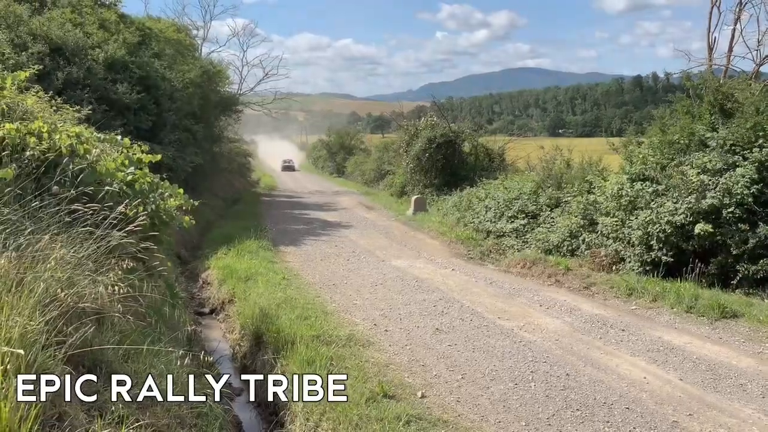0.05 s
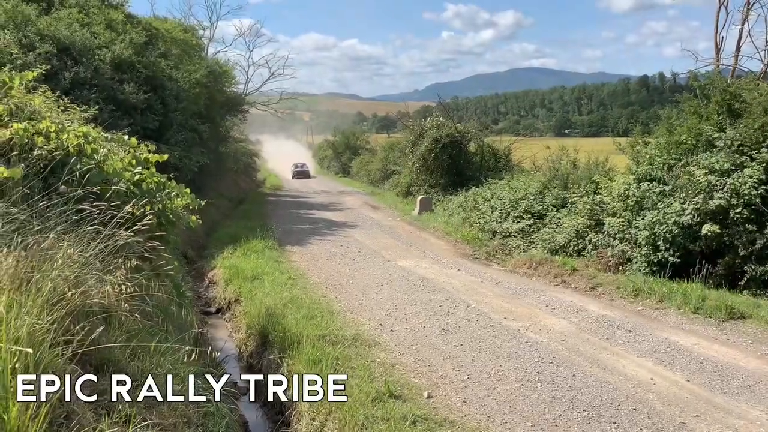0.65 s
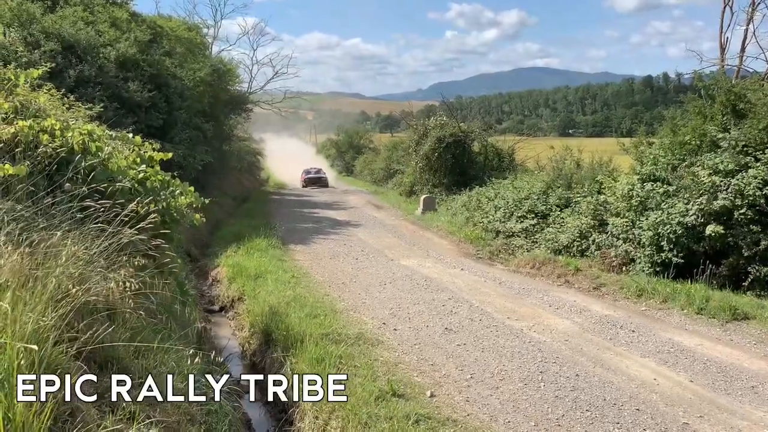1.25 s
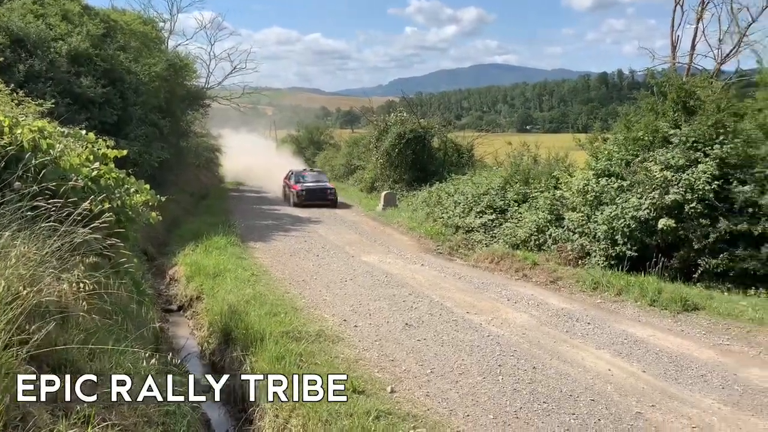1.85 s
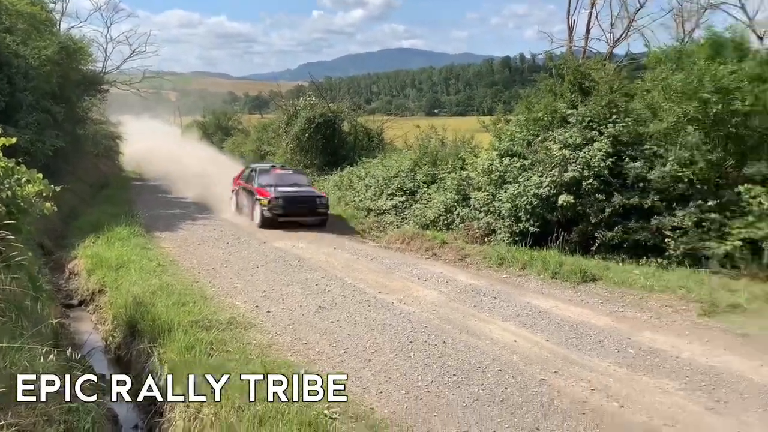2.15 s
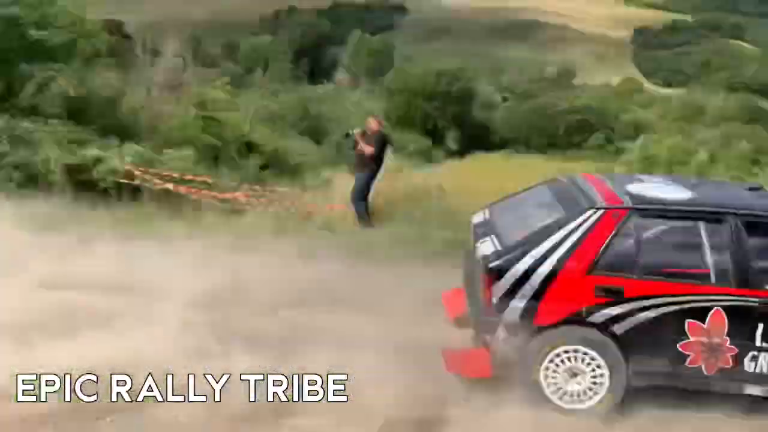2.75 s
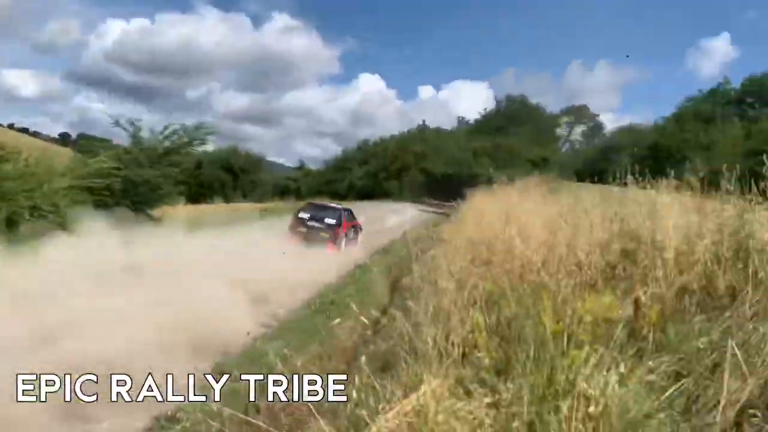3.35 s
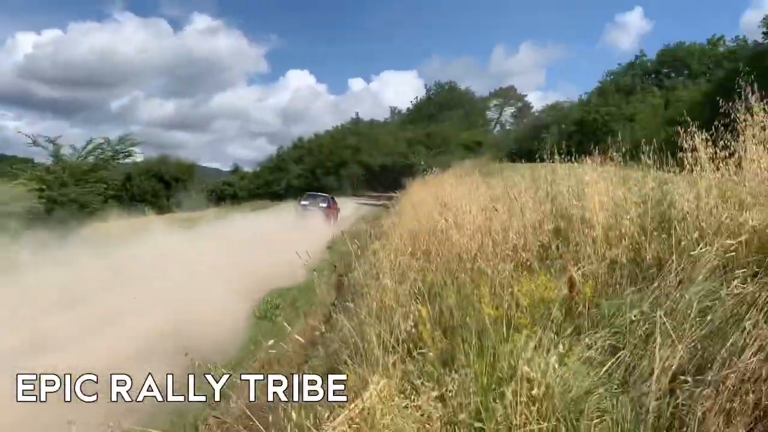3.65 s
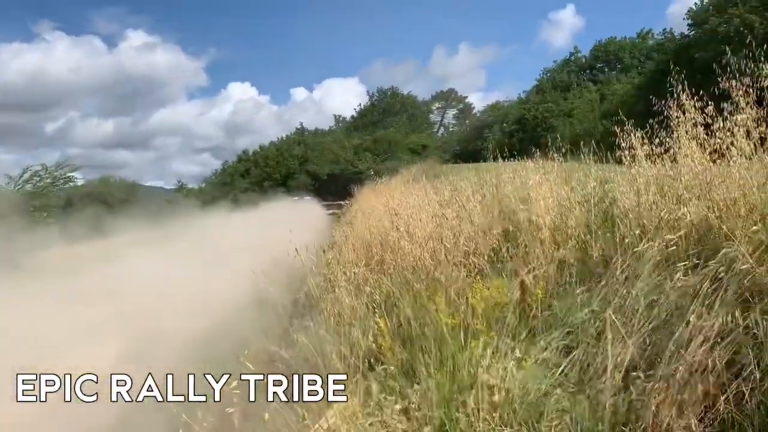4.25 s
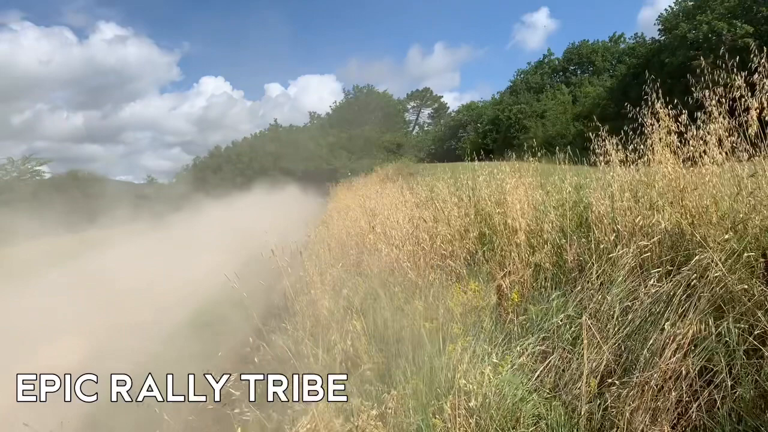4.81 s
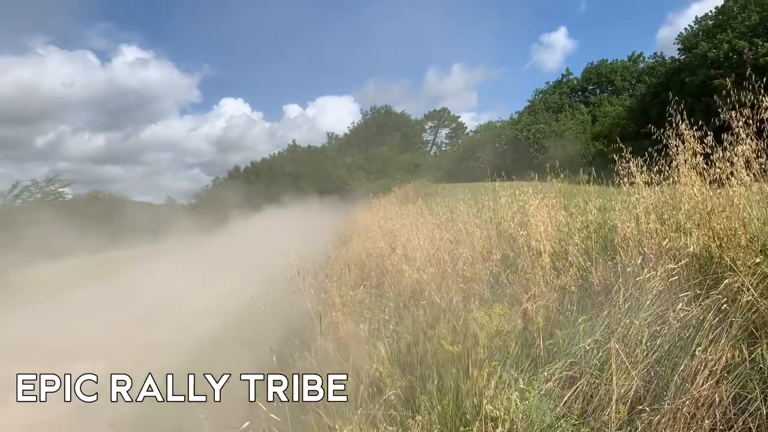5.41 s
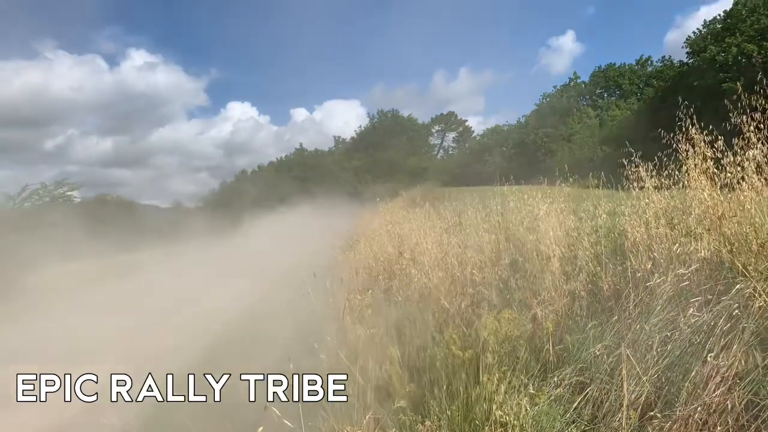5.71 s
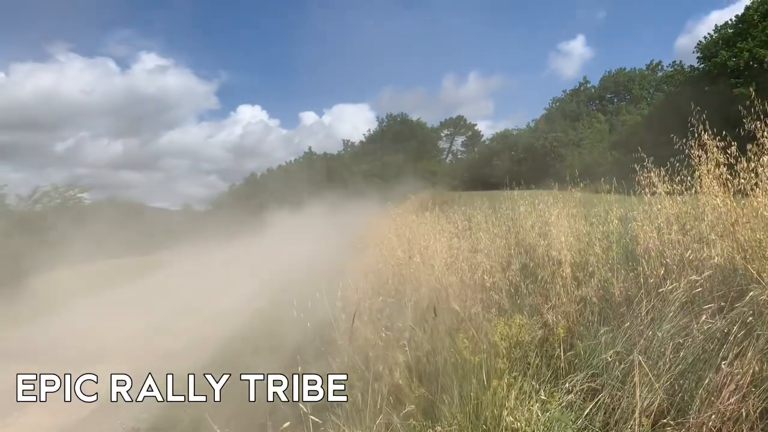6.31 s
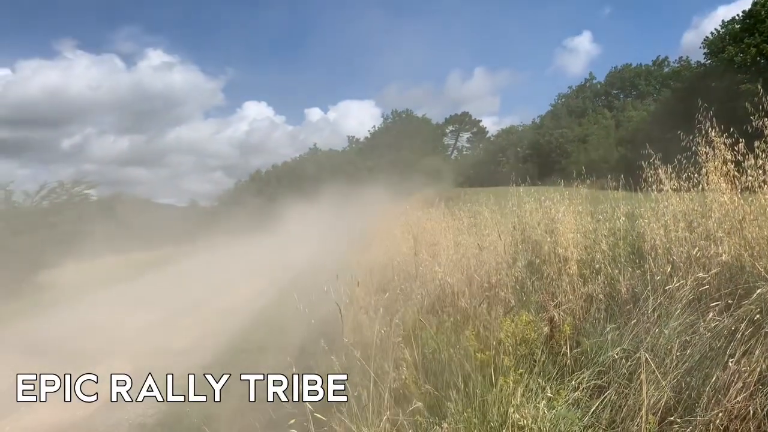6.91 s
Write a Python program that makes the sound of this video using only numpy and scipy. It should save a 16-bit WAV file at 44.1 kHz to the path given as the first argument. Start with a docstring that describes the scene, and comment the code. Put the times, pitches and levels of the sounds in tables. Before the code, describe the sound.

A rally car charges up on gravel, roars past close by spraying stones, backfires sharply and rasps away into the distance.

```python
"""Tyres roar on gravel and an engine snarls: a four-cylinder rally car charges up to a roadside microphone.
It passes about 7 m away at full throttle, spraying stones, and the driver lifts off. Unburnt fuel pops in
the pipe, with two loud backfires; then the car rasps away over a rise as the driver works the throttle.
Each firing sends a pulse of gas that rings the exhaust and tears out of the tailpipe.
The hedges give a short echo, and the air rumbles at the microphone."""
import sys
import numpy as np
from scipy import signal
from scipy.fft import rfft, irfft, next_fast_len
from scipy.io import wavfile
from scipy.ndimage import uniform_filter1d, map_coordinates

SR = 44100
rng = np.random.default_rng(int(sys.argv[2]) if len(sys.argv) > 2 else 0)


def waveform_to_disk(signal):
    """Save audio, clipped to [-1, 1], as 16-bit WAV at the path in sys.argv[1]."""
    frames = np.transpose(np.atleast_2d(signal))
    scaled = np.clip(frames, -1, 1) * 32767
    samples = np.round(scaled).astype(np.int16)
    wavfile.write(sys.argv[1], SR, samples)


N = 307377
TIME = np.arange(N) / SR

# Engine speed: (time [s], firing rate [Hz])
REVS = [(0.0, 185.9), (0.16, 166.5), (0.4, 194.7), (0.56, 192.7), (0.68, 172.2), (0.8, 175.1),
        (0.92, 153.7), (1.0, 160.1), (1.1, 180.4), (1.55, 168.4), (1.82, 174.8), (1.98, 172), (2.14, 180.9),
        (2.4, 177.4), (2.54, 200.6), (2.78, 163.8), (3.0, 158.8), (3.1, 150.9), (3.56, 150), (3.66, 168),
        (3.9, 164.6), (4.08, 146.6), (4.35, 115.1), (4.52, 126.5), (4.62, 154.6), (4.8, 137.8),
        (4.9, 133.8), (4.94, 178.8), (5.04, 169.3), (5.12, 178), (5.34, 173.7), (5.66, 143.9), (5.75, 168),
        (5.84, 147), (5.91, 169.6), (6.0, 162.1), (6.22, 184), (6.48, 177.4), (6.71, 152.1), (6.8, 170.5),
        (6.97, 183.2)]
# The driver's foot: (time [s], pedal [0-1])
THROTTLE = [(0, 0.25), (1.25, 0.19), (1.48, 0.52), (1.65, 0.8), (1.82, 0.87), (1.92, 0.3), (2.13, 0.75),
            (2.32, 0.56), (2.68, 1), (3.02, 0.84), (3.08, 0), (4.46, 0.08), (4.6, 0.2), (5.55, 0.6),
            (5.8, 0.61), (6.97, 0.84)]
# Cylinders in firing order, at full unevenness: (strength [dB], header delay [ms])
CYLINDERS = [(-5, -0.21), (3.5, -0.22), (2.5, -0.061), (-9, 0.82)]
# How unequal the cylinders sound: (time [s], depth [0-1])
UNEVEN = [(2.85, 0.74), (4.3, 0.38), (4.65, 0.47), (5.1, 1), (5.6, 0.76), (6.2, 0.57), (6.7, 0.65)]
# The exhaust booms most at low revs: (firing rate [Hz], gain [dB])
BOOM_GAIN = [(112, -3), (135, -0.5), (153, -1.5), (165, -4.5), (180, -5), (200, -8.5)]
# The boom swells as the car digs in: (time [s], boost [dB])
SURGES = [(.72, 1), (.97, 3)]
# The resonance in which the howl peaks: (frequency [Hz], gain [dB])
HOWL_GAIN = [(310, -1.5), (340, -5), (360, -2.5), (400, -11.5)]
# The tailpipe swings towards the microphone: (time [s], pipe level [dB], rasp level [dB])
NEAR_LEVELS = [(2.3, -27.5, -26), (2.5, -23.5, -26.5), (2.65, -27.5, -34.5), (2.74, -32.5, -14),
               (2.85, -22.5, -8.5), (2.92, -23.5, -14), (2.98, -24.5, -24), (3.04, -34.5, -16.5),
               (3.07, -34, -76)]
# Close up, the pipe, its rasp and its churning gas: (frequency [Hz], gain [dB])
NEAR_PIPE = [(50, -42), (120, 2), (200, -2.5), (280, 6), (390, 9), (480, 6.5), (580, -11), (760, -17.5),
             (970, -6.5), (1300, -15.5), (2000, -15.5), (4000, -45.5)]
NEAR_RASP = [(400, -39), (1000, -5), (1350, 2), (1700, 2), (2150, 1), (2750, -9), (4000, -6), (5500, -6),
             (7000, -18), (9000, -21), (15000, -46)]
CHURN = [(150, -10), (320, 5), (520, -3.5), (1200, -19)]
# From a distance, the hollow pipe, the slack pipe and the rasp: (frequency [Hz], gain [dB])
HOLLOW_PIPE = [(40, -67), (90, 10), (135, 3.5), (220, -27.5), (310, -39.5), (410, 1), (490, -4), (575, 3.5),
               (680, -6.5), (850, -44.5), (1150, -10), (1600, -24), (2400, -52)]
SLACK_PIPE = [(40, -30), (90, -9), (135, -12), (220, -40), (310, -7.5), (420, 18.5), (520, 10), (630, -5.5),
              (800, 13), (950, -32), (1600, -46), (2400, -56.5)]
FAR_RASP = [(400, -66), (900, -2), (1150, -0.5), (1550, 4.5), (2000, 3), (2650, -21.5), (3500, -10),
            (5000, -25), (8000, -38.5), (15000, -61.5)]
# Colour of the receding pipe: (time [s], blend [0 slack - 1 hollow])
HOLLOWNESS = [(3.05, 0.6), (4.3, 0.58), (4.6, 0.78), (5.6, 0.99), (6.3, 0.5), (6.8, 0.16)]
# The rasp from behind: (time [s], level against the pipe [dB])
RASP_LEVEL = [(3.05, -14), (3.3, -16.5), (4.2, -11), (4.47, -24), (4.8, -10.5), (5.2, -11.5), (5.55, -9),
              (5.72, -8), (5.98, -7.5), (6.1, -9.5), (6.5, -10.5), (6.75, -4)]
# Unburnt fuel flares up in the pipe: (time [s], boost [dB])
FLARES = [(3.17, 10), (3.49, 7), (3.74, 9.5), (3.85, 8)]
# Backfires, from muffled pops to sharp bangs: (time [s], thump level [dB], crack level [dB])
BANGS = [(0.579, -18, -50), (3.039, -17.5, -25.5), (3.14, -25, -43.5), (3.486, -28.5, -36.5),
         (3.504, -21, -29.5), (3.5386, -26, -25.5), (3.544, -24.5, -32), (3.662, -22, -37),
         (3.694, -25, -31), (3.7664, -12.5, -8.5), (3.9109, -11.5, -4.5), (4.063, -31, -53)]
# The gas column in the pipe: (frequency [Hz], level [dB], t60 [s])
PIPE_MODES = [(285, -13, .07), (470, -14, .06), (594, -15, .05), (807, -12, .035), (1443, -18, .02),
              (1631, -18, .02)]
# Single hard firings, far up the road: (time [s], level [dB])
HARD_FIRINGS = [(6.632, -41), (6.657, -49), (6.6825, -30.5), (6.7085, -29.5), (6.7345, -34)]
# Colour of a backfire's crack and of a hard firing: (frequency [Hz], gain [dB])
BLAST = [(200, -1), (700, 19), (1500, 7), (2400, -13.5), (3800, 4.5), (6000, 0), (9000, 1), (15000, -16)]
HARD_BODY = [(400, -5), (900, -2), (1600, 9), (2100, 7), (2650, -5), (3600, 11), (5200, -5),
             (7000, -4), (15000, -46)]
# The pitched snarl coming up and the pitched pull going away: (time [s], level [dB])
SNARL = [(0, -46.5), (0.499, -46.5), (0.899, -31), (1.2, -34.5), (1.601, -43), (1.85, -26.5), (2.2, -39)]
PULL = [(4.5, -48), (4.63, -39), (4.9, -48.5), (5.15, -49), (5.5, -47.5), (5.8, -49.5), (6.1, -56),
        (6.35, -52.5), (6.701, -51), (6.97, -52)]
# Their colours: (frequency [Hz], gain [dB])
SNARL_BODY = [(200, -27), (310, -4), (400, 9), (490, 1), (560, -3.5), (680, -1.5), (820, -13), (1000, -12),
              (1500, -26), (3000, -42)]
PULL_BODY = [(250, -41.5), (370, 3), (440, 1.5), (500, -11), (585, 10), (660, -8.5), (770, -9), (920, -34),
             (1150, -12.5), (1650, -24), (2400, -49.5)]
# Resonances of the silencer and of the escaping gas: (time [s], frequency [Hz], level [dB])
GROWL = [(4.45, 570, -62), (4.63, 595, -43), (4.85, 560, -49), (5.15, 560, -44), (5.36, 565, -44),
         (5.55, 595, -45), (5.9, 610, -51), (6.35, 590, -53), (6.65, 640, -62)]
SIZZLE = [(2.55, 3100, -68.5), (2.65, 3250, -41), (2.72, 3500, -25.5), (2.755, 4000, -22.5),
          (2.86, 4300, -37.5), (3.03, 3700, -41), (3.1, 3600, -80), (4.4, 3200, -83), (4.6, 3200, -63),
          (4.95, 3400, -85), (5.5, 3700, -70), (5.8, 3600, -75), (6, 3400, -66), (6.2, 3200, -67.5),
          (6.45, 3400, -91)]
# Their colours: (frequency [Hz], gain [dB])
GROWL_BODY = [(150, -32), (450, 19), (750, 7), (2500, -19)]
SIZZLE_BODY = [(1500, -17.5), (3000, -1), (4500, 1.5), (8000, -10)]
# Engine overtones that sing out close by: (multiple of the firing rate [x], level [dB])
WHINES = [(3.75, 2), (5.25, 4), (7.25, -2.5), (10.25, -2.5)]
# Tyres scrub the gravel, stones crunch under them, larger ones are flung: (time [s], level [dB])
SCRUB = [(0, 2.5), (.25, 2.5), (.95, -2), (1.15, -4), (1.38, -1.5), (1.55, -4.5), (1.97, 2), (2.3, -0.5),
         (2.6, 4), (2.76, 6)]
CRUNCH = [(2.0, -43.5), (2.35, -40.5), (2.55, -35.5), (2.74, -27.5), (2.88, -30.5), (3.05, -46.5),
          (3.2, -51.5)]
STONES = [(0.4968, -28), (2.748, -10), (2.7538, -10), (2.7968, -15), (2.9956, -19.5), (3.8631, -37),
          (4.4941, -48), (4.6342, -52)]
# Tyre roar, the spray's hiss and fizz, a stone's click, rumbling air: (frequency [Hz], gain [dB])
ROAR = [(50, -41.5), (100, -18.5), (150, -1), (260, -4.5), (400, 2.5), (540, -6), (660, -3.5), (820, -11.5),
        (980, -8.5), (1600, -25), (2500, -62), (5000, -83.5)]
HISS = [(700, -3), (1400, 3), (2500, -3), (4000, -1.5), (5200, -5.5), (7000, -4.5), (9000, -4),
        (12000, -14.5), (15500, -40)]
FIZZ = [(7000, -41.5), (11500, 1), (13500, -9), (15500, -15)]
CLICK = [(300, -31), (2000, -12.5), (4000, 7), (6000, 9.5), (9000, 7.5), (15000, -8.5)]
RUMBLE = [(20, -45.5), (35, -19.5), (50, 4), (75, 6.5), (110, 4.5), (200, -1.5), (500, -42)]
# Breeze at the microphone: (time [s], level [dB])
WIND = [(3, -47.5), (5, -55.5), (6.25, -57), (6.5, -48)]
# Echo off the hedges: (frequency [Hz], t60 [s])
HEDGE_DECAY = [(150, .6), (1500, .1), (4000, .04), (10000, .04)]
# Leaves scatter little bass: (frequency [Hz], gain [dB])
LEAVES = [(200, -16.5), (1200, 8), (4000, 3)]
# The car's direction from the microphone: (time [s], right minus left [dB])
BEARING = [(0, 2), (2.2, 1.55), (2.6, 3), (3.6, 2), (4.4, 2), (6.97, 1.3)]
# Most of the scene reaches the two channels out of step, by a fixed phase that depends on frequency: (frequency
# [Hz], left lead [rad])
PORT_PHASE = [(100, .03), (700, .35), (1500, 1.1), (2100, 2.6), (2450, .9), (3200, 1.5), (4800, 2.3),
              (6000, 2.4), (7200, 3.14), (8200, 2.1), (9000, .3), (9700, -.3), (10600, -1.8), (11400, -3.1),
              (12200, -3.2), (13000, -5), (13600, -6.2)]
# Stereo width: (frequency [Hz], diffuse minus direct [dB])
WIDTH = [(60, -17), (150, -33.5), (380, -10.5), (950, -9.5), (2400, 0), (4500, -4.5), (9000, -11.5),
         (15000, -11)]

SPEED_M_PER_S, DISTANCE_M, PASS_S = 28.4, 6.75, 2.39  # the car's speed, nearest distance, time there
LIFT_S = 3.05  # the driver lifts off
DUCK_DB, DUCK_RECOVER_S = 17.5, 0.45  # just after the loud pass the boom is ducked, then swells back
RISE_S, RISE_TAKES_S = 4.1, 0.87  # the car sinks behind the rise
ROUGH_SHUT, ROUGH_OPEN = 0.43, 0.035  # irregular burning (0-1), off and on the throttle
THUMP_START_HZ, THUMP_END_HZ, THUMP_SINK_S, THUMP_T60_S = 874, 83, 0.00286, 0.089
THUMP_LAG_S = 0.00082  # the gas leaves the pipe just after the crack
SPRAY_END_S, SPRAY_FADE_S, SPRAY_DROP_DB = 2.785, 0.39, 23  # the shower dies once the car is past
CRUNCH_PER_S, CRUNCH_MIDDLE_HZ, CRUNCH_CYCLES = 600, 2690, 7
GROUND_MS = 1  # delay of the bounce off the road when the car is nearest
TOP_HZ = 15900


def crank(flutter):
    """Count of firings so far; the speed flutters as the tyres slip."""
    return np.cumsum(curves(REVS)[0] * (1 + flutter * wobble(45))) / SR


def throttle():
    """The pedal, 0 shut to 1 open."""
    return np.clip(curves(THROTTLE)[0], 0, 1)


def roughness():
    """The engine burns evenly under load and misfires ever more as the throttle shuts."""
    return ROUGH_OPEN + (ROUGH_SHUT - ROUGH_OPEN) * (1 - throttle()) ** 2.4


def firings(count, scatter, jitter):
    """One exhaust pulse per firing, sized and delayed by cylinder; misfires scatter size and timing."""
    k = np.arange(1, int(count[-1]))
    due = np.interp(k, count, TIME)
    rough = np.interp(due, TIME, roughness())
    depth = np.interp(due, *np.transpose(UNEVEN))
    level_db, delay_ms = depth * np.array(CYLINDERS)[k % len(CYLINDERS)].T
    chance = rng.standard_normal((len(k), 2))
    size = amp(level_db + scatter * rough * chance[:, 0])
    size /= np.sqrt(uniform_filter1d(size ** 2, size=12))  # steady power over three engine cycles
    fired = due + delay_ms / 1000 + jitter * rough * chance[:, 1]
    at = np.clip(np.round(fired * SR), 0, N - 1).astype(int)
    return np.bincount(at, size, N)


def drone(count):
    """The two lowest firing orders: exhaust boom, and a howl under load until the driver lifts off."""
    firing_hz, rough, after_pass = curves(REVS)[0], roughness(), ramp(LIFT_S - .02, 0.036)
    cycle = 2 * np.pi * count / len(CYLINDERS)  # unequal cylinders make both throb once per cycle
    duck_db = DUCK_DB * after_pass * np.exp(-np.abs(TIME - LIFT_S) / DUCK_RECOVER_S)
    boom_db = along(BOOM_GAIN, firing_hz) + swells(SURGES, half_s=0.19) - duck_db + 4 * rough * wobble(40)
    boom = carried(db=-8.5, ahead_db=-1, throttle_db=2, hidden_db=4.5) * amp(boom_db)
    boom *= (1 - 0.23 * np.cos(cycle)) * np.sin(2 * np.pi * count)
    howl_db = along(HOWL_GAIN, 2 * firing_hz) + 3.1 * rough * wobble(60)
    howl = carried(db=-32.5, ahead_db=4.5, throttle_db=29) * amp(howl_db)
    howl *= (1 - 0.17 * np.sin(cycle)) * np.sin(4 * np.pi * count + 0.58 * rough * wobble(55))
    return np.sqrt(2) * (boom + howl * (1 - after_pass))


def exhaust_near(pulses, count):
    """Close to the microphone the open tailpipe blares, thickened by churning gas, and tears past."""
    pipe_db, rasp_db = curves(NEAR_LEVELS)
    firing_hz = curves(REVS)[0]
    ragged = pulses * amp(2.5 * rng.standard_normal(N))
    churn = resonate(rng.standard_normal(N), 3 * firing_hz, t60=.06)
    churn += resonate(rng.standard_normal(N), 2.25 * firing_hz, t60=.03)
    pipe = unit(coloured(ragged, NEAR_PIPE)) + .5 * unit(coloured(churn, CHURN))
    tear = spread(rasp(np.sqrt(pulses), count, NEAR_RASP, puff_s=.0021, turbulence=.3))
    return (amp(pipe_db + 4) * pipe + amp(rasp_db - 16) * tear) * during(NEAR_LEVELS, 0.049)


def exhaust_far(pulses, count):
    """From behind, the pipe is hollow, louder under load, flares off the throttle, and rattles."""
    hollow = np.clip(curves(HOLLOWNESS)[0], 0, 1)
    pipe = hollow * unit(coloured(pulses, HOLLOW_PIPE))
    pipe += (1 - hollow) * unit(coloured(pulses, SLACK_PIPE))
    hardest = pulses ** (1 + 0.7 * throttle())  # under load the hardest firings tear most
    rattle = unit(rasp(hardest, count, FAR_RASP, puff_s=.0028, turbulence=.33)[0])
    rattle_db = curves(RASP_LEVEL)[0] + 2.8 * wobble(14)
    gain = carried(db=-28, throttle_db=11) * amp(swells(FLARES, half_s=0.085))
    return gain * ramp(LIFT_S - .05, 0.051) * (pipe + amp(rattle_db) * rattle)


def rasp(pulses, count, spectrum, puff_s, turbulence):
    """Each pulse lets out a jagged puff of gas whose shape repeats every engine cycle, plus turbulence."""
    gate = signal.fftconvolve(pulses, np.exp(-np.arange(SR // 25) / SR / puff_s))[:N]
    shapes = rng.standard_normal(size=(2, 1024))
    angle = count / len(CYLINDERS) % 1 * shapes.shape[1]  # tied to the crank: overtones follow the revs
    jagged = np.array([map_coordinates(shape, [angle], mode="grid-wrap") for shape in shapes])
    return coloured(unit(gate * (jagged + turbulence * rng.standard_normal((2, N)))), spectrum)


def backfires():
    """Fuel explodes in the pipe: a crack, then a thump diving as the gas expands while the column rings."""
    ring, t = np.zeros(N), np.arange(SR // 4) / SR
    thump_hz = THUMP_END_HZ + (THUMP_START_HZ - THUMP_END_HZ) * np.exp(-t / THUMP_SINK_S)
    thump = amp(-60 * t / THUMP_T60_S) * np.sin(2 * np.pi * np.cumsum(thump_hz) / SR)
    modes = sum(amp(db - 60 * t / t60) * np.sin(2 * np.pi * hz * t) for hz, db, t60 in PIPE_MODES)
    for s, thump_db, _ in BANGS:
        ring[round((s + THUMP_LAG_S) * SR):][:len(t)] += amp(thump_db) * (thump + modes)
    cracks = [(s, crack_db) for s, _, crack_db in BANGS]
    return ring + coloured(bursts(cracks, t60=0.007), BLAST)


def hard_firings():
    """Far up the road, a few single firings crack out of the pipe."""
    return coloured(bursts(HARD_FIRINGS, t60=0.011), HARD_BODY)


def overtones(count, level, body):
    """The strongest cylinder beats once per engine cycle; the body rings with a comb of its overtones."""
    cycles = np.arange(1, int(count[-1] / len(CYLINDERS)))
    strongest = np.argmax([db for db, _ in CYLINDERS])
    at = np.interp(cycles * len(CYLINDERS) + strongest, count, np.arange(N)).astype(int)
    beats = np.bincount(at, minlength=N).astype(float)
    return amp(curves(level)[0]) * during(level, 0.085) * unit(coloured(beats, body))


def growl(pulses):
    """Every firing rings the silencer, so the strong cylinders stutter against the weak ones."""
    hz, db = curves(GROWL)
    ring = resonate(pulses, hz, t60=.024)
    return amp(db) * during(GROWL, .05) * unit(coloured(ring, GROWL_BODY))


def sizzle(pulses):
    """Each puff of gas excites a thin, high resonance that shifts as the car turns."""
    hz, db = curves(SIZZLE)
    gate = signal.lfilter([1], [1, -amp(-60 / (.015 * SR))], pulses)  # each puff dies in 15 ms
    ring = resonate(gate * rng.standard_normal((2, N)), hz, t60=.005)
    return amp(db) * during(SIZZLE, .05) * spread(coloured(ring, SIZZLE_BODY))


def whines():
    """Fuzzy engine overtones follow the revs and carry only near the microphone."""
    firing_hz = curves(REVS)[0]
    lines = sum(amp(db) * resonate(rng.standard_normal(N), multiple * firing_hz, t60=.07)
                for multiple, db in WHINES)
    return carried(db=-38, ahead_db=-1.5, throttle_db=7.5) * position()[0] * lines


def roar(pulses):
    """Engine growl from under the car mingles with tyre roar on loose gravel; both are thrown forwards."""
    engine = .7 * unit(signal.lfilter([1, -1], [1, -.98], pulses)) * [[1], [0]]  # centre only
    body = spread(coloured(unit(patchy(1.8)) + engine, ROAR))
    return carried(db=-19, ahead_db=9.5, hidden_db=5) * amp(curves(SCRUB)[0] + 0.71 * wobble(40)) * body


def spray():
    """The tyres throw a hissing spray of small stones; its finest fizz only carries a short way."""
    thrown_db = curves(SCRUB)[0] - SPRAY_DROP_DB * ramp(SPRAY_END_S, SPRAY_FADE_S) + 0.68 * wobble(25.03)
    gain = carried(db=-28, hidden_db=9) * amp(thrown_db)
    grit = (rng.random((2, N)) < 1500 / SR) * rng.standard_normal((2, N))  # 1500 hits a second
    grit *= amp(1.9 * rng.exponential(size=(2, N)).clip(0, 4))
    grains = unit(patchy(3)) + .5 * unit(grit)
    hiss = amp(5.5) * gain * spread(coloured(grains, HISS))
    fizz = amp(6.5) * gain ** 1.39 * spread(coloured(grains[::-1], FIZZ))
    return hiss + fizz


def crunch():
    """Stones grind and knock together under the passing tyres, each ringing for a few cycles."""
    when, pitch, force = rng.random((int(CRUNCH_PER_S * N / SR), 3)).T[:, :, None]
    t = np.arange(SR // 80) / SR
    hz = CRUNCH_MIDDLE_HZ * 2 ** (2.4 * (pitch - .5))  # spread over 2.4 octaves
    size = amp(-5 * np.log(force + .02))  # many faint, a few loud
    rings = size * np.sin(2 * np.pi * hz * t) * np.exp(-2 * hz * t / CRUNCH_CYCLES)
    at = (when * N).astype(int) + np.arange(len(t))
    knocks = np.bincount(at.ravel(), rings.ravel(), N)[:N]
    return amp(curves(CRUNCH)[0]) * during(CRUNCH, 0.039) * unit(knocks)


def stones():
    """Larger stones click against the underbody and the road."""
    return coloured(bursts(STONES, t60=0.0093), CLICK)


def air():
    """Low rumble: the exhaust burbles off the throttle and tyres pound the road, over a light breeze."""
    car = carried(db=-19.5, ahead_db=6, throttle_db=-12.5, hidden_db=11) * amp(0.15 * curves(SCRUB)[0])
    breeze = amp(curves(WIND)[0])
    return np.hypot(car, breeze) * amp(0.98 * wobble(12)) * spread(coloured(patchy(0.99), RUMBLE))


def hedges(x):
    """A short diffuse answer from the roadside bushes, different at each microphone port."""
    hz, t, noise = signal.stft(rng.standard_normal((2, SR // 2)), SR, nperseg=256)
    tail = signal.istft(noise * amp(-60 * t / along(HEDGE_DECAY, hz)[:, None]), SR, nperseg=256)[1]
    return signal.fftconvolve(coloured(x, LEAVES)[None], tail / np.linalg.norm(tail[0]), axes=1)[:, :N]


def road_bounce(x, strength):
    """A second path off the road: its notches sweep down as the car nears and up as it leaves."""
    late = np.arange(N) - GROUND_MS * position()[0] * SR / 1000
    echo = np.array([map_coordinates(channel, [late], mode="nearest") for channel in x])
    return (x + strength * echo) / np.sqrt(1 + strength ** 2)


def position():
    """The car's nearness to the microphone (1 at the pass) and its facing (1 coming, -1 going)."""
    to_go_m = SPEED_M_PER_S * (PASS_S - TIME)
    range_m = np.hypot(to_go_m, DISTANCE_M)
    return DISTANCE_M / range_m, to_go_m / range_m


def carried(db, ahead_db=0, throttle_db=0, hidden_db=0):
    """Gain from car to microphone: 1 / distance, shaped by facing, pedal and the rise in between."""
    nearness, facing = position()
    shadow_db = hidden_db * ramp(RISE_S, RISE_TAKES_S)
    return nearness * amp(db + ahead_db * facing + throttle_db * throttle() - shadow_db)


def out_of_step(x):
    """Sound reaches the two channels with a fixed phase difference that depends on frequency."""
    size = next_fast_len(N + 8192)
    lead = along(PORT_PHASE, np.fft.rfftfreq(size, 1 / SR))
    return irfft(rfft(x, size) * np.exp(.5j * lead * np.array([[1], [-1]])), size)[:, :N]


def ports(x):
    """The microphone's right port hears the car a little louder."""
    return x * amp(curves(BEARING)[0] / 2 * np.array([[-1], [1]]))


def spread(pair):
    """Two unrelated signals become a stereo field: mono bass, wide treble."""
    mid, side = pair[0], coloured(pair[1], WIDTH)
    return np.array([mid + side, mid - side]) / np.std(mid)


def coloured(x, spectrum):
    """Pass x through a causal filter with the given (frequency [Hz], gain [dB]) shape."""
    size = 2 * next_fast_len(N // 2 + 8192)
    cepstrum = irfft(np.log(amp(along(spectrum, np.fft.rfftfreq(size, 1 / SR)))))
    cepstrum[1:size // 2] *= 2  # fold to minimum phase
    cepstrum[size // 2 + 1:] = 0
    return irfft(rfft(x, size) * np.exp(rfft(cepstrum)))[..., :N]


def resonate(x, hz, t60):
    """Ring a resonance whose centre hz moves over time."""
    turn = np.exp(2j * np.pi * np.cumsum(hz) / SR)
    return unit((signal.lfilter([1], [1, -amp(-60 / (t60 * SR))], x / turn) * turn).real)


def patchy(depth_db):
    """Two noises whose level wanders in patches of time and frequency."""
    noise = signal.stft(rng.standard_normal((2, N)), nperseg=1024)[2]
    patches = uniform_filter1d(rng.standard_normal(noise.shape[1:]), size=6, axis=0)
    patches = uniform_filter1d(patches, size=6, axis=1)
    return signal.istft(noise * amp(depth_db * unit(patches)), nperseg=1024)[1][:, :N]


def bursts(rows, t60):
    """A dying puff of noise at each (time [s], level [dB])."""
    out, t = np.zeros(N + SR), np.arange(SR // 4) / SR
    for s, db in rows:
        out[round(s * SR):][:len(t)] += amp(db - 60 * t / t60) * rng.standard_normal(len(t))
    return out[:N]


def wobble(rate):
    """A smooth random curve, rate knots a second."""
    return map_coordinates(rng.standard_normal(int(N * rate / SR) + 4), [TIME * rate])


def swells(rows, half_s):
    """A bell-shaped boost around each (time [s], boost [dB])."""
    return sum(db * np.exp(-((TIME - s) / half_s) ** 2) for s, db in rows)


def ramp(start_s, length_s):
    """A straight climb from 0 to 1."""
    return np.clip((TIME - start_s) / length_s, 0, 1)


def during(rows, fade_s):
    """1 while a table lasts, fading to 0 outside it."""
    return np.clip(1 + np.minimum(TIME - rows[0][0], rows[-1][0] - TIME) / fade_s, 0, 1)


def curves(rows):
    """One value per sample for each column after the time."""
    times, *columns = np.transpose(rows)
    return [np.interp(TIME, times, column) for column in columns]


def along(points, hz):
    """Read (frequency [Hz], value) points on a log axis."""
    knots_hz, values = np.transpose(points)
    return np.interp(np.log(hz + 1), np.log(knots_hz + 1), values)


def amp(db):
    """Decibels to gain."""
    return 10 ** (np.asarray(db) / 20)


def unit(x):
    """Scale to rms 1."""
    return x / np.sqrt(np.mean(x ** 2) + 1e-20)


def scene():
    """From the roadside: one crankshaft drives all the engine's voices; tyres and air surround them."""
    count = crank(flutter=.002)
    pulses = firings(count, scatter=9, jitter=0.0009)
    sharp = exhaust_far(pulses, count) + growl(pulses) + overtones(count, PULL, PULL_BODY)
    sharp += backfires() + hard_firings() + stones()
    approach = road_bounce(roar(pulses) + whines(), strength=0.11) + overtones(count, SNARL, SNARL_BODY)
    head_on = exhaust_near(pulses, count) + sizzle(pulses) + crunch()
    echo = amp(-20) * hedges(sharp)
    phased = out_of_step(drone(count) + approach + sharp + spray() + air())
    return ports(phased + head_on) + echo


def record(dry):
    """The recorder rounds off the highest peaks and keeps nothing above its band limit."""
    soft = dry / (1 + np.abs(dry) ** 8) ** (1 / 8)
    return irfft(rfft(soft) * (np.fft.rfftfreq(N, 1 / SR) < TOP_HZ), N)


dry = scene()
out = record(dry)
waveform_to_disk(out)
```